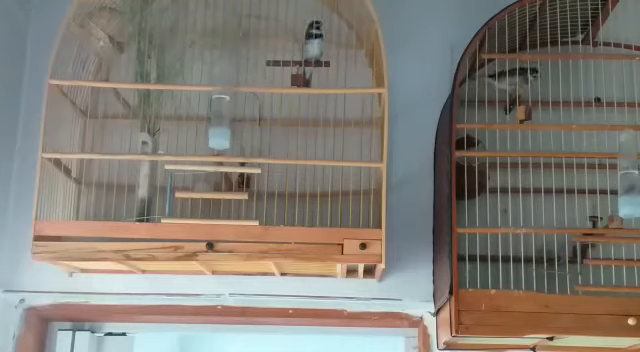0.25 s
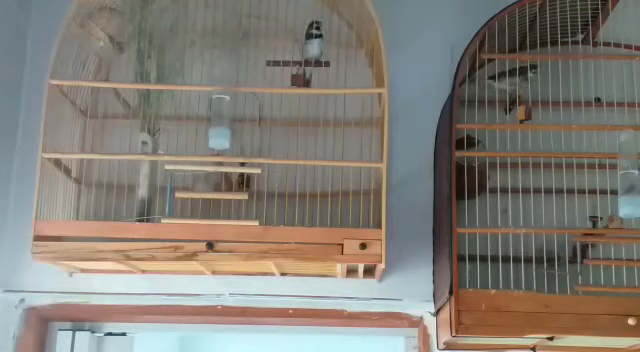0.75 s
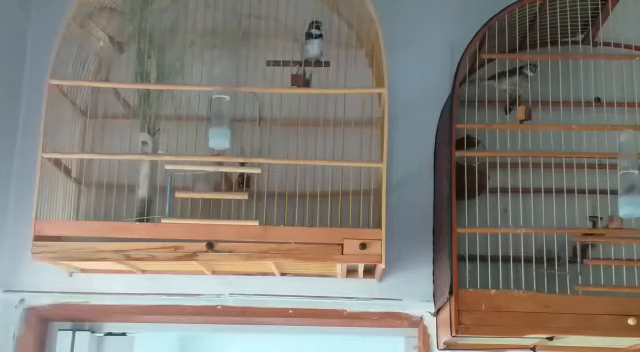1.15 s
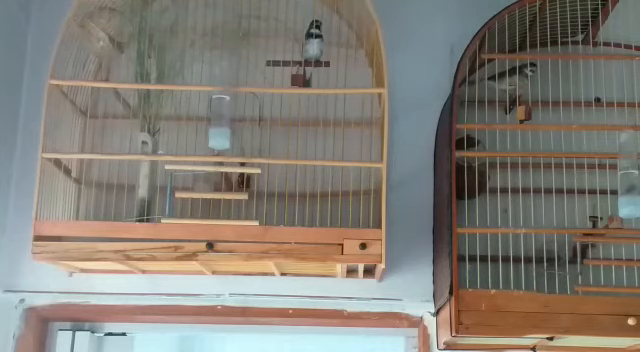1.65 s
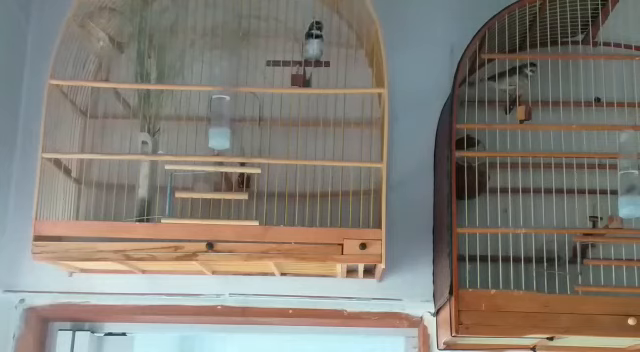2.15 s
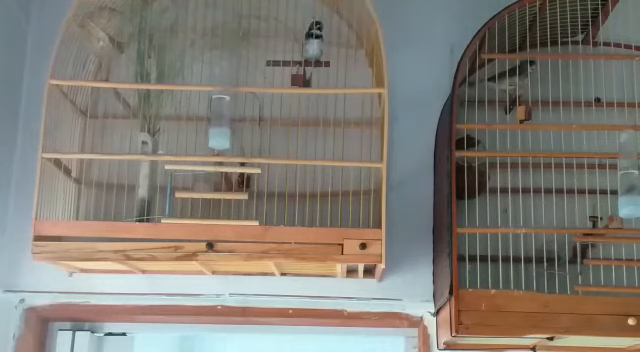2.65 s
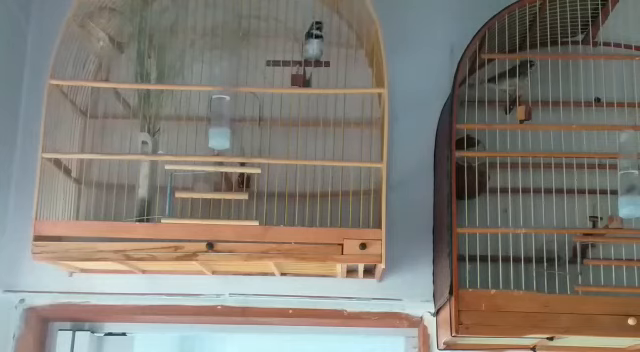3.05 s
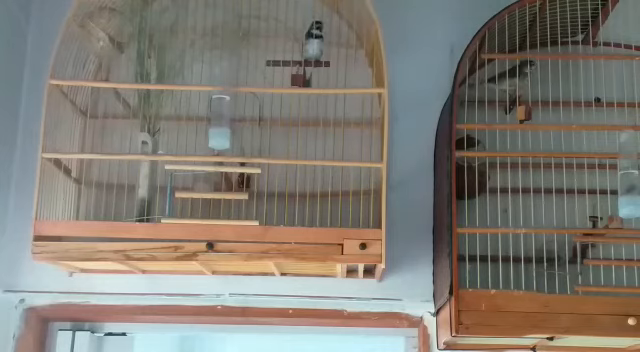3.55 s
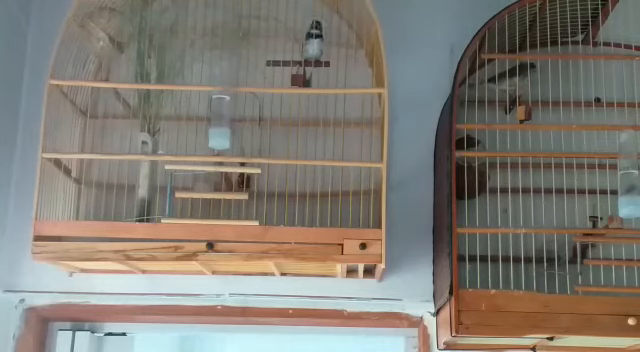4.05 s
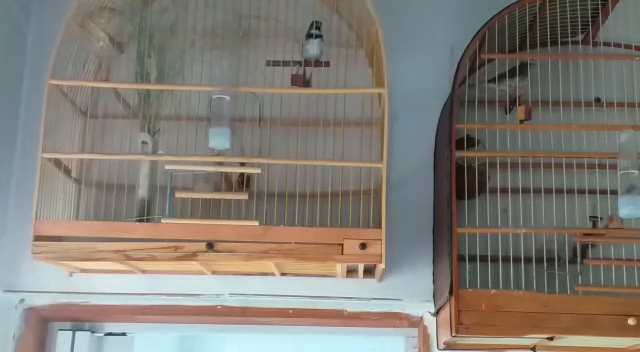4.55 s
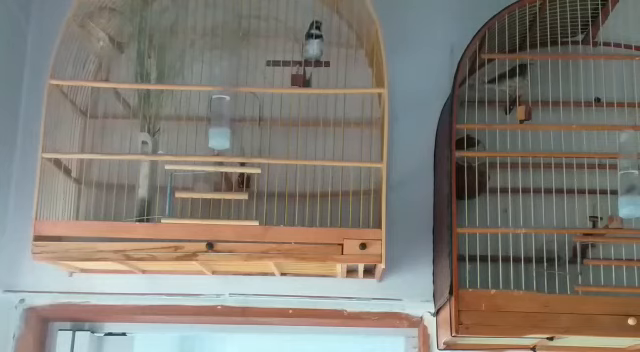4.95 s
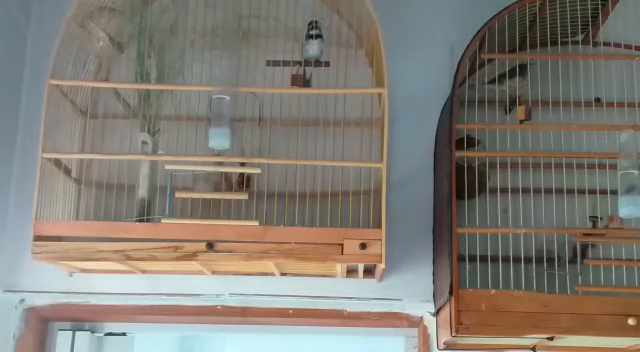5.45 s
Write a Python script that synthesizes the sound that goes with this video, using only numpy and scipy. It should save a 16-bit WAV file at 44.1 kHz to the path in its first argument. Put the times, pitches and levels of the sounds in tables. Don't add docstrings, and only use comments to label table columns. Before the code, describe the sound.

Steady low appliance hum and soft hiss run throughout. After about a second, a caged bird gives two thin upward whistles, overlapped by a more distant bird's slower rising answer and a quick muffled falling chirp. Quiet follows, then a lower, shorter pair of whistles, another pause, and a last high climbing pair. Hard indoor walls add a short ring; phone-like pickup with dulled extreme treble.

```python
import sys
import numpy as np
from scipy import signal
from scipy.fft import rfft, irfft
from scipy.io import wavfile
from scipy.ndimage import uniform_filter1d

SR = 44100
rng = np.random.default_rng(int(sys.argv[2]) if len(sys.argv) > 2 else 0)


def magnitude_from_level(level_db):
    exponent = np.asarray(level_db, float) / 20
    return 10 ** exponent


def file_out(sig):
    cols = np.atleast_2d(sig).T
    lim = np.clip(cols, -1, 1)
    pcm = np.round(lim * 32767).astype(np.int16)
    wavfile.write(sys.argv[1], SR, pcm)


N = 251400
SHAFT_HZ, MAINS_HZ = 59.32, 60.0


def at_hz(points, hz):
    table_hz, values = np.array(points).T
    return np.interp(np.log(hz), np.log(table_hz), values)


def drift(rate_hz):
    pole = np.exp(-2 * np.pi * rate_hz / SR)
    slow = signal.lfilter([1], [1, -2 * pole, pole * pole], rng.standard_normal(N + SR))[SR:]
    return slow / np.std(slow)


def coloured_noise(spectrum, ripple_db):
    hz = np.maximum(np.fft.rfftfreq(N, 1 / SR), 1)
    modes = np.interp(hz, np.arange(0, SR / 2, 14.0), rng.standard_normal(1575))
    gain = magnitude_from_level(at_hz(spectrum, hz) + ripple_db * modes)
    noise = irfft(rfft(rng.standard_normal(N)) * gain, N)
    return noise / np.std(noise)


def rattle():
    # (frequency [Hz], level [dB rms])
    typical = [(2500, -110), (3500, -95), (5000, -105.5), (6500, -87.5), (8000, -103.5), (8600, -98.5),
               (9300, -100), (12000, -100)]
    # (frequency [Hz], level [dB rms])
    strong_lines = [(3262, -80), (3736, -85), (4565, -85), (4861, -84), (5163, -81), (5216, -83),
                    (5599, -84), (6169, -85), (6288, -84), (6853, -87), (7144, -84), (7445, -83),
                    (7564, -86), (7709, -82), (8010, -81), (8032, -83), (8070, -85), (8161, -85),
                    (8220, -83), (8269, -84), (8393, -86), (9550, -92), (10142, -91), (11962, -91)]
    step_hz = SHAFT_HZ / 2
    orders = np.arange(1, 420)
    sizes = magnitude_from_level(at_hz(typical, orders * step_hz) + 3.2 * rng.standard_normal(len(orders)))
    for hz, db in strong_lines:
        sizes[round(hz / step_hz) - 1] = magnitude_from_level(db + 0.8)
    length = 2 ** 14
    partials = np.zeros(length // 2 + 1, complex)
    partials[orders] = sizes * np.exp(2j * np.pi * rng.random(len(orders)))
    pattern = irfft(partials, length) * length / np.sqrt(2)
    cycles = np.cumsum(step_hz * (1 + 0.00021 * drift(0.55))) / SR
    return np.interp(cycles % 1 * length, np.arange(length), pattern, period=length)


def appliance():
    # (frequency [Hz], level [dB rms])
    hum = [
        (SHAFT_HZ, -59.5),
        (2 * SHAFT_HZ, -61),
        (2 * MAINS_HZ, -65),
        (183.7, -50),
    ]
    # (frequency [Hz], density [dB per Hz])
    rumble = [(30, -56), (45, -35), (56, -17.5), (75, -16.5), (110, -7), (160, -13), (205, -8.5), (245, -3),
              (330, -8.5), (440, -16), (510, -13), (1040, -23.5), (1320, -22.5), (1550, -28), (1800, -25),
              (2300, -42), (4000, -91.5)]
    rumble_db, wander_db, wander_rad = -51, 0.7, 0.12
    t = np.arange(N) / SR
    tones = np.zeros(N)
    for hz, db in hum:
        level = np.sqrt(2) * magnitude_from_level(db + wander_db * drift(2.2))
        tones += level * np.sin(2 * np.pi * hz * t + wander_rad * drift(0.79))
    rumbling = magnitude_from_level(rumble_db) * coloured_noise(rumble, ripple_db=2.0)
    return tones + rumbling + magnitude_from_level(0.69 * drift(1.5)) * rattle()


def microphone_hiss():
    # (frequency [Hz], density [dB per Hz])
    hiss = [(1350, -51.5), (2300, -12), (2510, -7.5), (3120, -9.5), (3380, -8.5), (3540, -6.5),
            (4760, -5.5), (5040, -5), (6830, -11), (8010, -0.5), (9260, -15), (10200, -10.5), (15600, -14)]
    hiss_db, settles_db_per_s = -63, 0.23
    swell_db = hiss_db - settles_db_per_s * (np.arange(N) - N / 2) / SR
    return magnitude_from_level(swell_db + 0.5 * drift(3.5)) * coloured_noise(hiss, ripple_db=2.2)


def whistle(rows, overtone_db, flutter_db, waver, flutter, brightens):
    # (frequency [Hz], gain [dB])
    mic = [(2500, -3), (4000, 7), (6000, 9), (8000, -1), (9300, 0), (11000, -1.5), (13000, 10.5),
           (15500, 4)]
    soft_waver_per_db = 0.35
    bright_reference_db = -27.5
    s, hz, level_db = np.transpose(rows)
    span = np.arange(int(s[0] * SR), int(s[-1] * SR))
    t = span / SR
    effort_db = np.interp(t, s, level_db)
    loose = magnitude_from_level(soft_waver_per_db * np.clip(level_db.max() - effort_db, 0, 20))
    glide_hz = uniform_filter1d(np.interp(t, s, hz), size=130)
    pitch_hz = glide_hz * (1 + loose * waver[span])
    phase = 2 * np.pi * np.cumsum(pitch_hz) / SR
    unsteady_db = flutter_db * flutter[span]
    tone = np.sin(phase)
    for k, (below_db, slope) in enumerate(zip(overtone_db, brightens), start=2):
        bright_db = slope * (bright_reference_db - effort_db)
        tone += magnitude_from_level(below_db + bright_db + at_hz(mic, k * pitch_hz) + unsteady_db) * np.sin(k * phase)
    edges = np.clip(np.minimum(t - t[0], t[-1] - t) / 0.0063, 0, 1)
    out = np.zeros(N)
    out[span] = np.sqrt(2) * magnitude_from_level(effort_db + unsteady_db) * edges * tone
    return out


def even_out(response, width):
    spectrum = rfft(response)
    power = np.abs(spectrum) ** 2
    excess = np.log(uniform_filter1d(power, int(width)) / uniform_filter1d(power, size=900)) / 2
    half = len(response) // 2
    cepstrum = irfft(-excess, len(response))
    cepstrum[1:half] *= 2
    cepstrum[half:] = 0
    return irfft(spectrum * np.exp(rfft(cepstrum)), len(response))


def room(x, direct_db, wet_db, early_db, gap_s, build_s, linger):
    # (frequency [Hz], T60 [s])
    room_t60 = [(2500, 0.41), (3400, 0.4), (3900, 0.44), (4350, 0.47), (5000, 0.38), (7000, .37),
                (13000, 0.33)]
    early_t60_s = 0.1
    t = np.arange(int(SR * 0.9)) / SR
    edges_hz = 1800 * 2 ** np.arange(0, 3.3, 0.2)
    early = magnitude_from_level(early_db - 60 * t / early_t60_s)
    tail = np.zeros(len(t))
    for low, high in zip(edges_hz, edges_hz[1:]):
        band_filter = signal.butter(2, [low, high], "band", fs=SR, output="sos")
        band = signal.sosfilt(band_filter, rng.standard_normal(len(t)))
        late = magnitude_from_level(-60 * t / (linger * at_hz(room_t60, np.sqrt(low * high))))
        tail += band * (late + early)
    tail *= 1 - np.exp(-np.maximum(t - gap_s, 0) / build_s)
    energy = np.sum(tail ** 2) * SR / 2 / (edges_hz[-1] - edges_hz[0])
    tail = magnitude_from_level(wet_db) * tail / np.sqrt(energy)
    tail[0] = magnitude_from_level(direct_db)
    return signal.fftconvolve(x, even_out(tail, width=19.8))[:N]


def far_song(notes, overtone_db, flutter_db, waver_share):
    waver, flutter = waver_share * drift(89), drift(120)
    return sum(whistle(rows, overtone_db, flutter_db, waver, flutter, (0, 0)) for rows in notes)


def distant_bird():
    # (start [s], length [s], from [Hz], to [Hz], peak [dB])
    distant_notes = [
        (0.704, 0.037, 4420, 3750, -60.5),
        (1.328, 0.03, 5600, 5400, -61),
        (1.338, 0.038, 4860, 4050, -48),
        (2.109, 0.095, 6410, 3990, -39.5),
        (2.203, 0.0477, 3730, 2720, -45.5),
    ]
    peak_share, start_db, end_db = 0.35, -11.5, -4
    chirps = []
    for s, length_s, from_hz, to_hz, db in distant_notes:
        peak_hz = from_hz + peak_share * (to_hz - from_hz)
        chirps.append([(s, from_hz, db + start_db),
                       (s + peak_share * length_s, peak_hz, db),
                       (s + length_s, to_hz, db + end_db)])
    song = far_song(chirps, (), flutter_db=6.5, waver_share=0.0067)
    return room(song, direct_db=-25.5, wet_db=-4.0, early_db=2.5, gap_s=0.0005, build_s=0.02, linger=1.3)


def rasps():
    rasp_times = [1.106, 1.456, 1.578, 3.342, 3.659, 3.716, 3.746, 4.788, 4.889, 5.229, 5.288, 5.362]
    # (peak [dB], centre [Hz], length [s])
    rasp_kinds = [(-44.5, 4500, .002), (-45, 5420, .002), (-38, 5800, 0.0016), (-47, 6000, 0.0043),
                  (-43, 4800, 0.0031), (-33, 4800, 0.0054), (-32, 5200, 0.0065), (-54, 4800, .0064),
                  (-45, 5000, .0084), (-41, 3850, 0.0035), (-42, 6000, 0.0092), (-33, 5500, 0.0025)]
    out, t = np.zeros(N), np.arange(1300) / SR
    for s, (peak_db, hz, length_s) in zip(rasp_times, rasp_kinds):
        swell = np.sqrt(np.abs(np.sin(np.pi * t / length_s)))
        puff = rng.standard_normal(len(t)) * (t < length_s) * swell
        puff[0] = magnitude_from_level(10.5)
        throat = signal.butter(2, [hz * 0.83, hz * 1.14], "band", fs=SR, output="sos")
        at = round(s * SR)
        out[at:at + len(t)] += magnitude_from_level(peak_db + 7) * signal.sosfilt(throat, puff)
    return out


def near_bird():
    # (time [s], pitch [Hz], level [dB])
    phrase_1 = [
        [(1.107, 3310, -38), (1.127, 3770, -37), (1.147, 3767, -30.5), (1.166, 3984, -28), (1.198, 4018, -22),
         (1.225, 3882, -35.5)],
        [(1.455, 2835, -47.5), (1.468, 3200, -46), (1.492, 3360, -34), (1.5, 3530, -28), (1.548, 3880, -25),
         (1.56, 4104, -24), (1.586, 4289, -23.5), (1.622, 4302, -19.5), (1.642, 4300, -32.5)],
    ]
    phrase_2 = [
        [(3.343, 3450, -38), (3.353, 3270, -45.5), (3.381, 3290, -43), (3.39, 3455, -25.5),
         (3.399, 3590, -40.5), (3.42, 3780, -29), (3.428, 3894, -19), (3.454, 3886, -25), (3.465, 3040, -47.5)],
        [(3.66, 3100, -65), (3.672, 2892, -38.5), (3.69, 2795, -43), (3.706, 3050, -35.5), (3.724, 3357, -30.5),
         (3.733, 3450, -23), (3.741, 3445, -38.5), (3.753, 2980, -50)],
    ]
    phrase_3 = [
        [(4.788, 3420, -48.5), (4.81, 3506, -37), (4.834, 3712, -24), (4.854, 3728, -28.5),
         (4.867, 3996, -18.5), (4.892, 3970, -29), (4.903, 4244, -23.5), (4.93, 4293, -36)],
        [(5.231, 3043, -66), (5.241, 3037, -39.5), (5.29, 3131, -38), (5.3, 3412, -23.5), (5.342, 3963, -28),
         (5.35, 4083, -19), (5.364, 4206, -30), (5.372, 4360, -20.5), (5.42, 4218, -27)],
    ]
    # (2nd [dB], 3rd [dB], 4th [dB], flutter [dB], pitch waver [share])
    voices = [
        (-33, -46.5, -63, 1, 0.0043),
        (-28.5, -34, -47, 2, .005),
        (-26, -37, -44.5, 0, 0.0028),
        (-19.5, -29, -36, 1.5, 0.011),
        (-29, -39.5, -54, 1.5, 0.0064),
        (-30.5, -36.5, -48, 2.5, 0.0086),
    ]
    brightens = (0.43, 0.22, 0.22)   # 2nd, 3rd, 4th overtone [dB per dB of softening]
    waver, flutter = drift(200), drift(61)
    song = rasps()
    for rows, (*overtone_db, flutter_db, share) in zip(phrase_1 + phrase_2 + phrase_3, voices):
        song += whistle(rows, overtone_db, flutter_db, share * waver, flutter, brightens)
    return song


def near_in_room():
    turns_s = [
        0,
        3.0,
        3.655,
        4.5,
        6,
    ]
    # (direct [dB], reflected [dB], decay time [share of T60])
    postures = [
        (0, 2.5, 0.91),
        (0.5, 3, 0.93),
        (2.5, -0.5, 0.98),
        (-0.5, 3, .93),
    ]
    song, t = near_bird(), np.arange(N) / SR
    out = np.zeros(N)
    for start, end, (direct_db, wet_db, linger) in zip(turns_s, turns_s[1:], postures):
        held = song * (t >= start) * (t < end)
        out += room(held, direct_db, wet_db, early_db=6.0, gap_s=0.003, build_s=0.0013, linger=linger)
    return out


def far_bird():
    # (time [s], pitch [Hz], level [dB])
    prelude = [
        (1.378, 3124, -59),
        (1.405, 3370, -46),
        (1.47, 3358, -29.5),
    ]
    # (start [s], length [s], top pitch [Hz], peak [dB])
    far_notes = [
        (1.619, .23, 3718, -30),
        (1.891, .225, 3870, -28),
    ]
    # (time [share of length], pitch [share of top], level [dB re peak])
    shape = [
        (0.0, .735, -32.5),
        (0.129, .76, -14.5),
        (.27, .79, -18),
        (.48, .98, 0),
        (0.679, 1.0, -2.5),
        (.88, 1, -14),
        (1.002, .97, -24),
    ]
    notes = [prelude]
    for s, length_s, top_hz, peak_db in far_notes:
        notes.append([(s + length_s * share, top_hz * ratio, peak_db + db) for share, ratio, db in shape])
    song = far_song(notes, (-42, -37), flutter_db=2.0, waver_share=0.0087)
    return room(song, direct_db=-7, wet_db=-5.5, early_db=0.0, gap_s=0.0031, build_s=0.0047, linger=1.93)


def scene():
    machine = appliance() + microphone_hiss()
    birds = distant_bird() + near_in_room() + far_bird()
    return (machine + birds)[None]


def band_limit(x):
    return signal.sosfilt(signal.butter(12, 15720, fs=SR, output="sos"), x)


def record(dry):
    low_pass = signal.cheby2(16, 80, 16400, fs=SR, output="sos")
    return band_limit(signal.sosfilt(low_pass, dry))


dry = scene()
out = record(dry)
file_out(out)
```